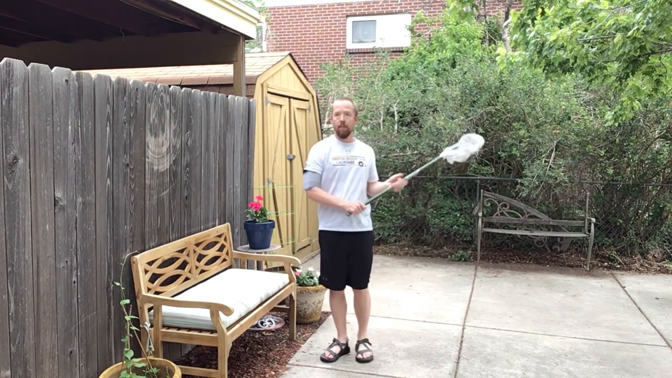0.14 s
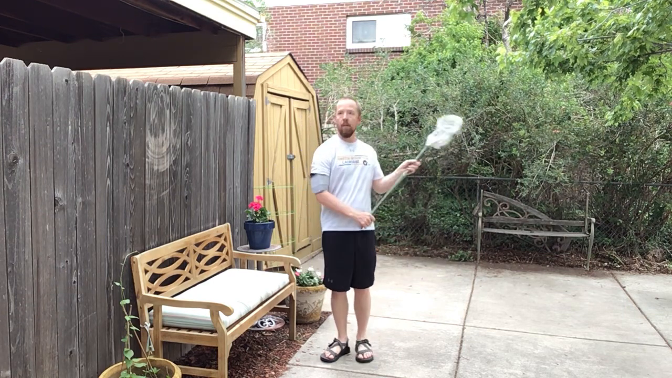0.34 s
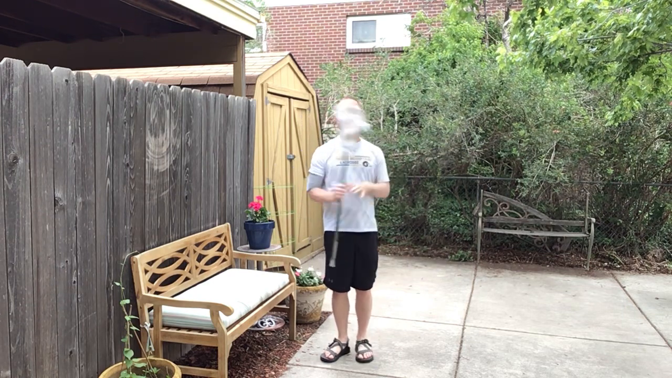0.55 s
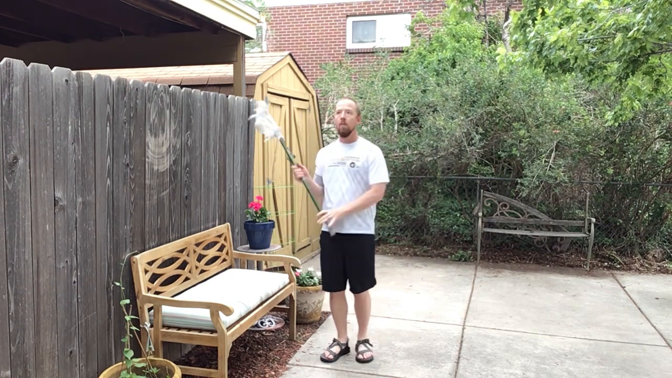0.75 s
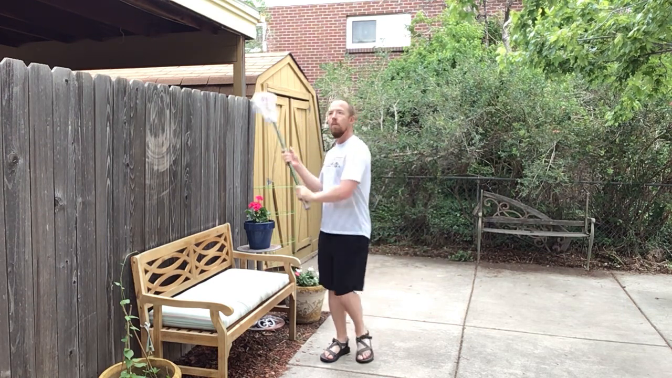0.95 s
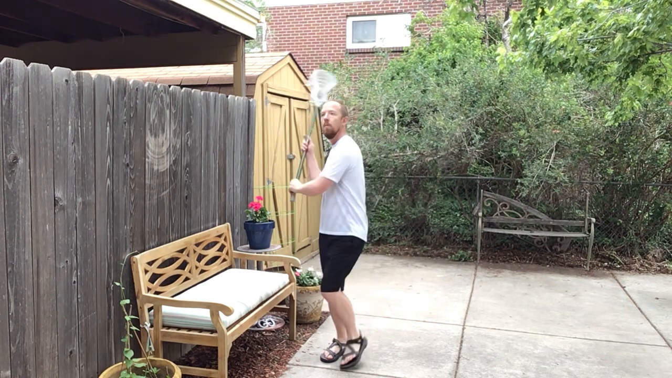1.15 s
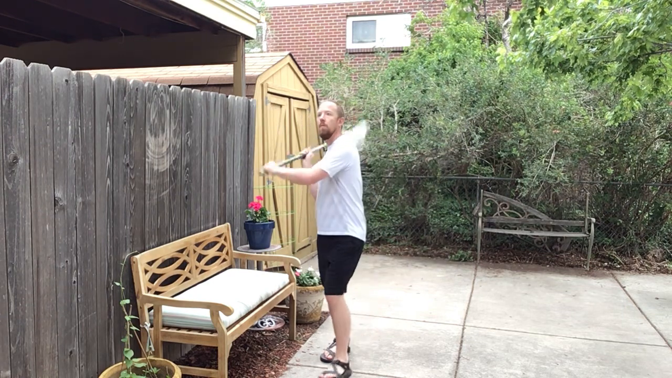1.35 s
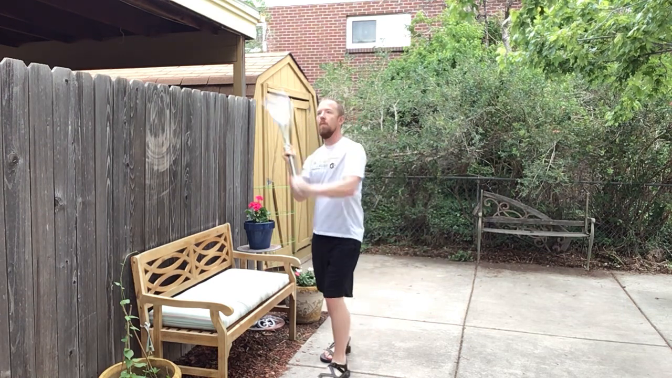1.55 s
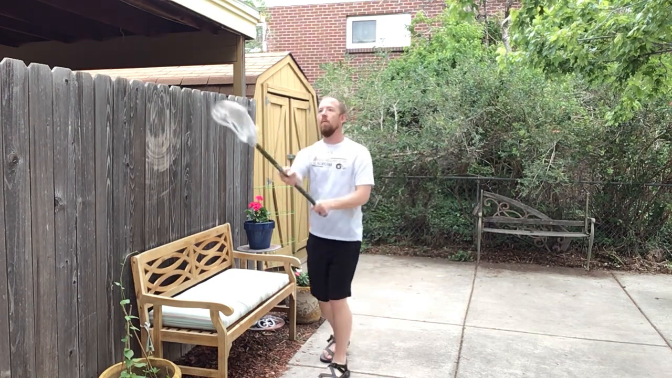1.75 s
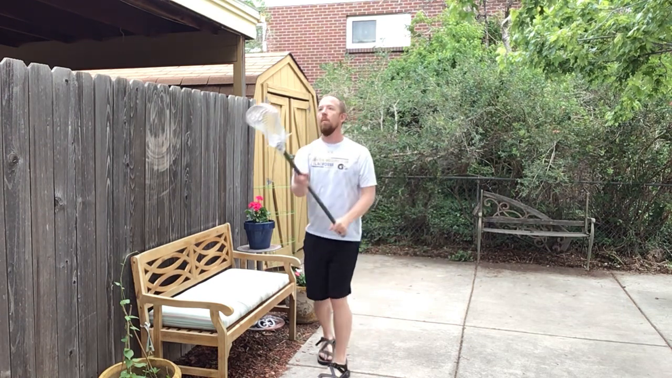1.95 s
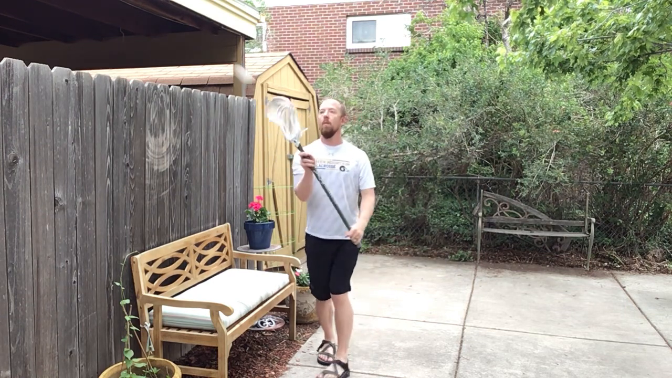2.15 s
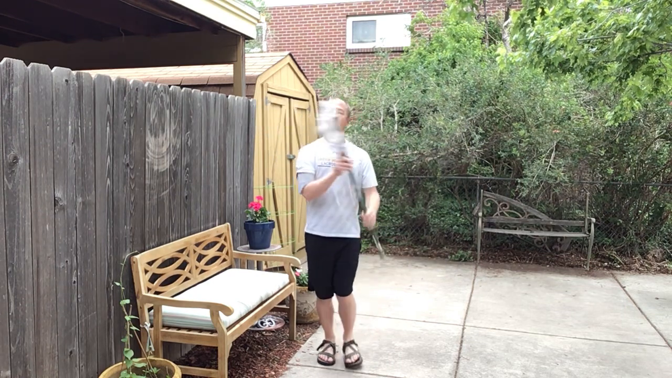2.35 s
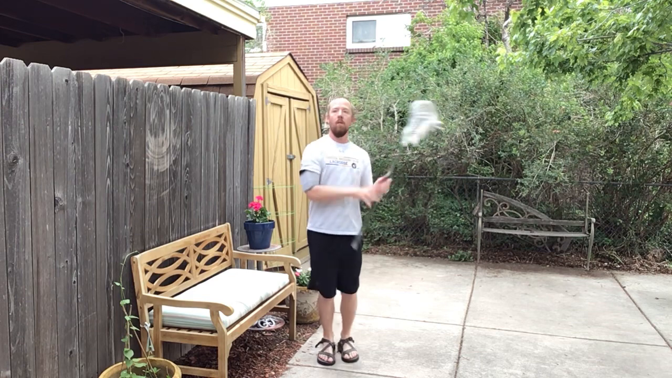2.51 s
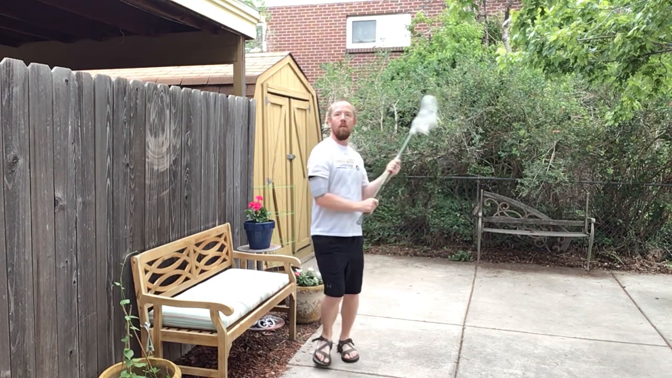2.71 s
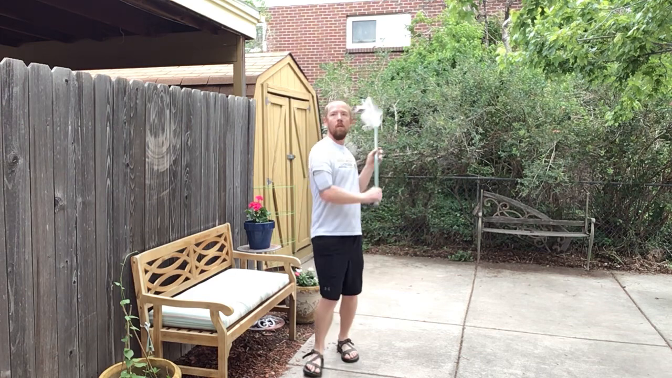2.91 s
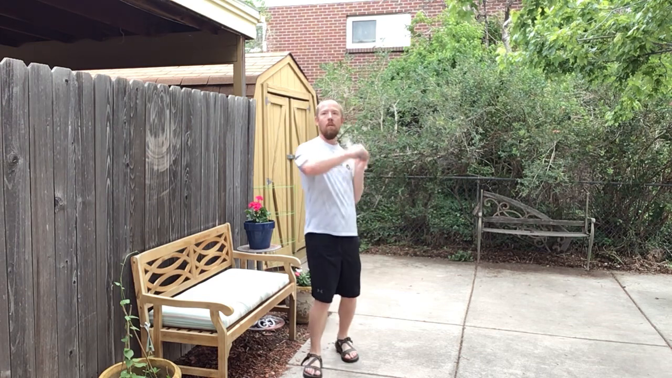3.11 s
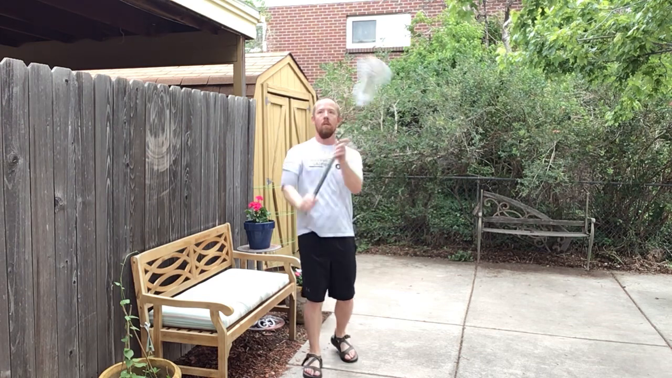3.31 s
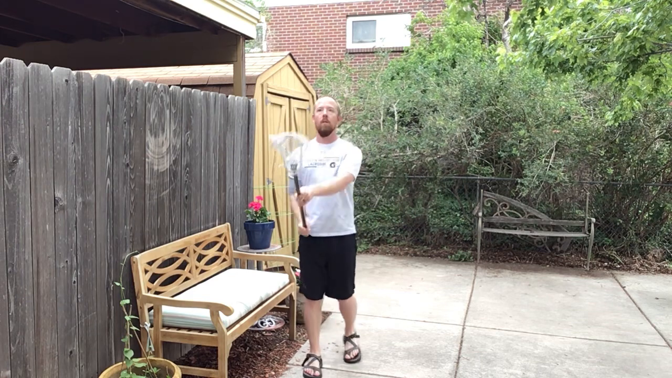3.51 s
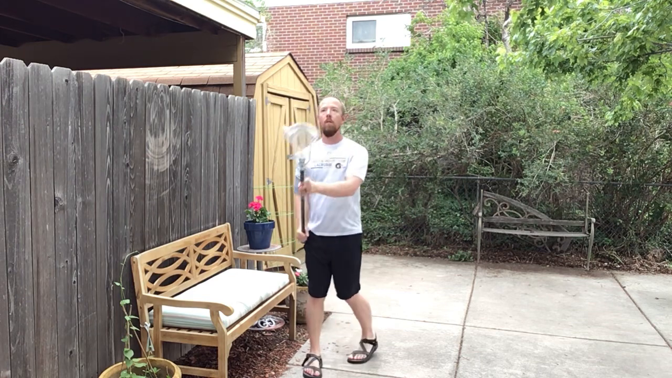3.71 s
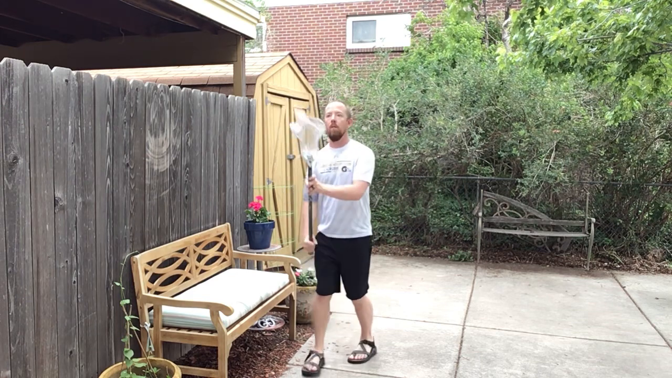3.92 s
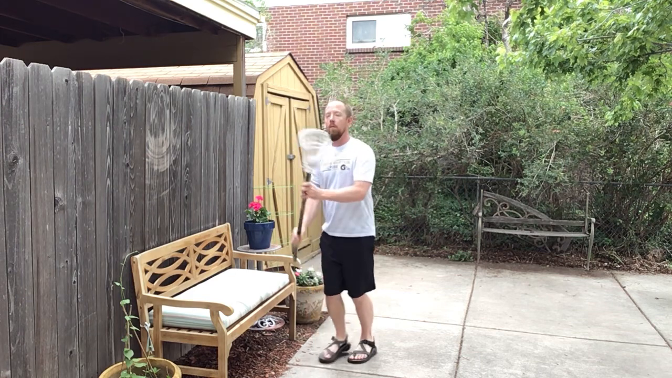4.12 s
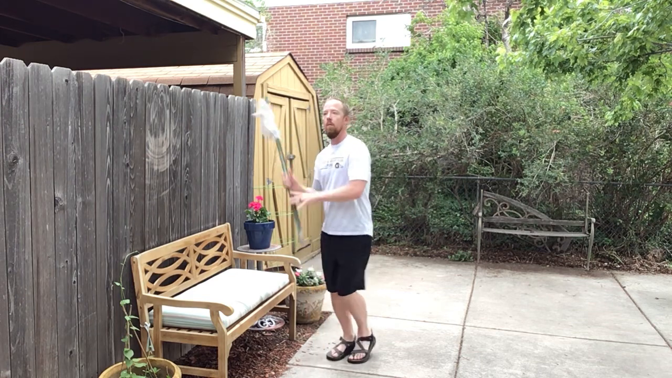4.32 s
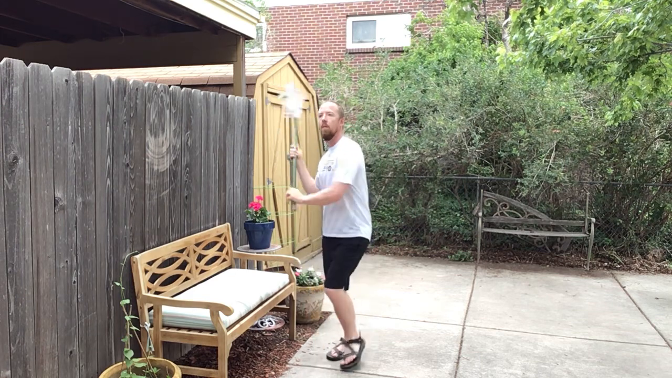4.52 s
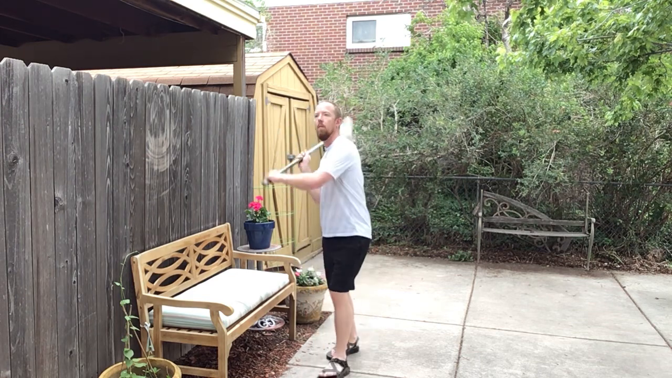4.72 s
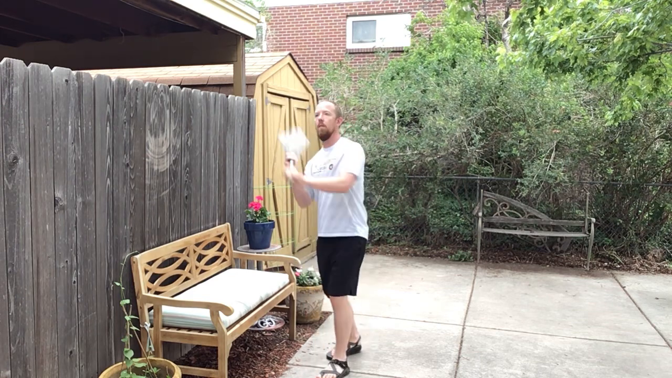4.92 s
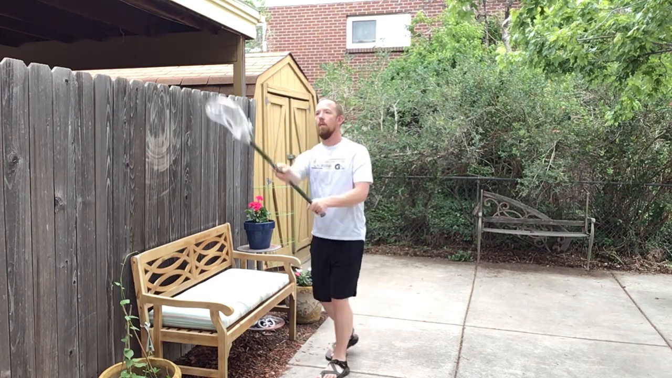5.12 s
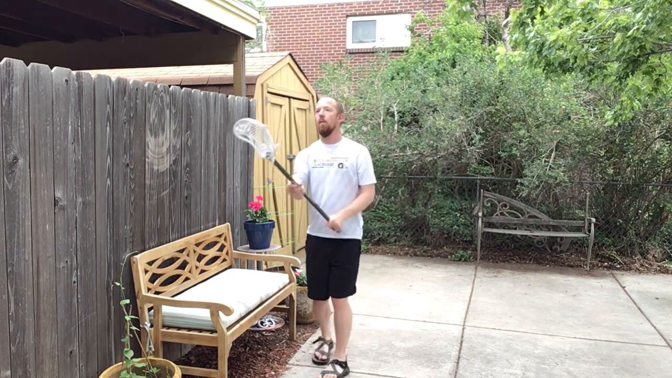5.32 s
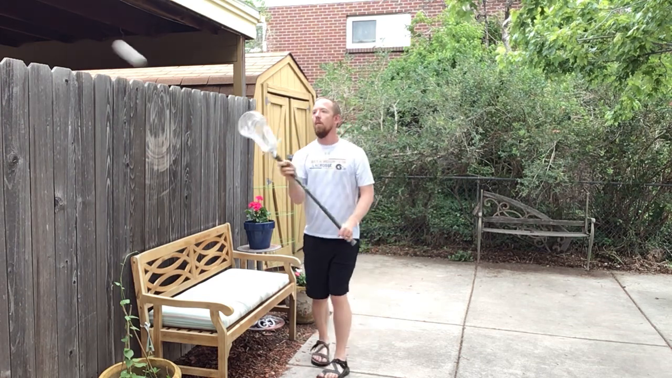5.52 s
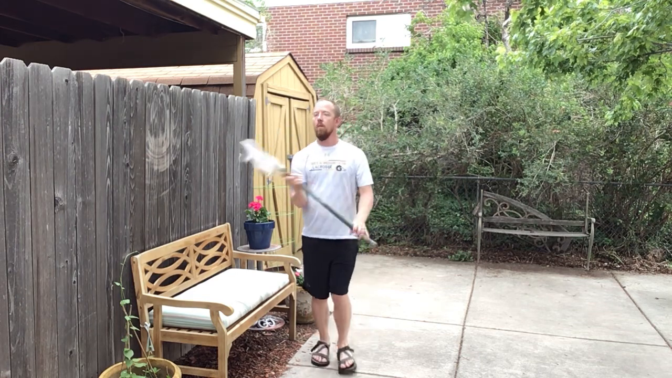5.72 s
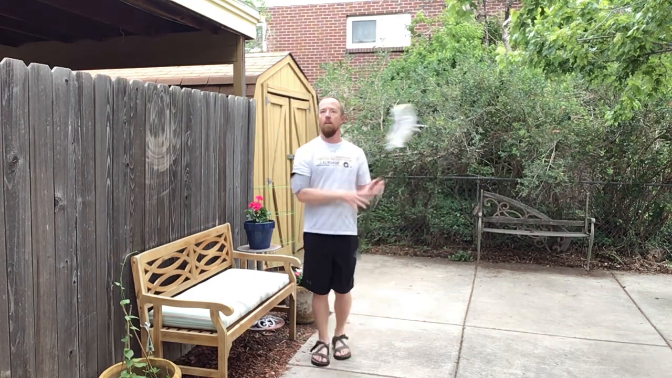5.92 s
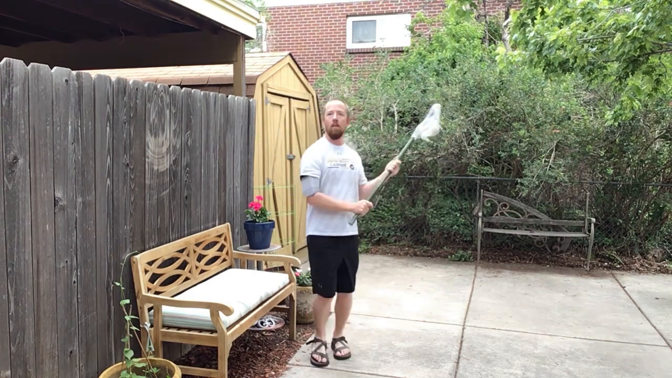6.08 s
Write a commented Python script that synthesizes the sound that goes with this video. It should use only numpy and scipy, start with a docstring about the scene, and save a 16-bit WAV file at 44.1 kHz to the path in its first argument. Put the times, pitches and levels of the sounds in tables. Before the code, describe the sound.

A faint, steady rumble of a distant town lies under a paved back yard. In the first second and a half, a few thin bird notes sound, with tiny ticks and rustles from a lacrosse stick being cradled. At about 1.9 seconds a rubber ball thuds against a wooden wall: a low, hollow boom with a slap and short clatter of boards and a tight echo. The hit repeats at 3.6 seconds, with a sharper crack, and at 5.3 seconds. These three thuds are by far the loudest sounds. About a third of a second after each, near 2.2, 4.0 and 5.7 seconds, the ball smacks softly into the mesh pocket and knocks the plastic head, then settles with a tick. The first catch is the quietest; the second adds a snap of strings. A bird chips at 2.4 seconds, and soft movement bumps come near 4.3 and 5.5 seconds.

```python
"""A paved back yard, lacrosse wall-ball: three throws thud against a wooden wall, whose boards
slap, boom, ring and clatter, with echoes off the paving, house and shed. A third of a second
after each thud the rubber ball smacks into the stick's mesh pocket and rings its plastic head.
The stick rattles and rustles as it is cradled; faint birds and a far town rumble lie behind."""
import sys
import numpy as np
from scipy import signal
from scipy.fft import rfft, irfft
from scipy.io import wavfile
from scipy.ndimage import uniform_filter1d

SR = 44100
rng = np.random.default_rng(int(sys.argv[2]) if len(sys.argv) > 2 else 0)


def put_to_file(sound):
    """Save the sound as 16-bit audio at rate SR, in the file named by the first command-line argument."""
    columns = np.atleast_2d(sound).T  # one column per channel
    safe = np.clip(columns, -1, 1)
    whole_steps = np.round(safe * 32767)
    wavfile.write(sys.argv[1], SR, whole_steps.astype(np.int16))


N = 271215
TIME = np.arange(N) / SR

# The ball hits the wall. Each row: crack start in seconds, crack level in dB, loss per slap in dB,
# clatter level in dB, thud start in seconds, thump level in dB, thump pitch in Hz, boom level in dB,
# boom rise in seconds, ring loss an octave off its centre in dB.
WALL_HITS = [(1.8860, -39, 3.5, -41, 1.888, -17.5, 251, -17, 0.0088, 4),
             (3.6242, -28, 7.5, -40.5, 3.6309, -23.5, 303, -19, 0.017, -0.5),
             (5.3023, -37, 1.5, -43, 5.2996, -18, 242, -16.5, 0.0087, 0.7)]
# The wall's ring. Each row: pitch in Hz, level in dB, time to fall 60 dB in seconds.
WALL_MODES = [(78.9, -12.5, 0.76), (101.3, 3, 0.48), (129.7, -4.5, 0.49), (168.4, 15, 0.13),
              (183.4, -1, 0.35), (217, -9, 0.63), (238.5, 6, 0.2), (253.6, -14, 0.3), (272.7, -4, 0.37),
              (339.8, -5.5, 0.273), (361.4, -17.5, 0.22), (404, -12, 0.29), (496, -22.5, 0.21),
              (516.7, -19.5, 0.26), (598, -23, 0.28)]
# Slapback from paving, house and shed. Each row: delay in seconds, level in dB.
YARD_ECHOES = [(.0062, -14), (0.0339, -8.5), (0.0858, -19)]
# The ball lands in the pocket. Each row: start in seconds, mesh level in dB, mesh centre in Hz,
# mesh width in octaves, knock level in dB, knock centre in Hz, tug level in dB, tug pitch in Hz,
# settling time in seconds, settling level in dB.
POCKET_CATCHES = [(2.222, -57.5, 4200, 0.89, -54, 1700, -54, 222, 2.4275, -60.5),
                  (3.9679, -50, 2000, 0.85, -45.5, 950, -43.5, 543, 4.169, -62),
                  (5.666, -50, 3830, 0.2, -46, 2200, -45.5, 290, 5.891, -62.5)]
# The plastic head's resonances. Each row: centre in Hz, width in Hz, boost in dB.
HEAD_RESONANCES = [(1025, 140, 8.5), (1480, 140, 5.5), (2570, 210, 5.5), (3040, 200, 3.5), (3990, 100, 6),
                   (4500, 120, -4)]
# Strings snap taut. Each row: start in seconds, level in dB.
STRING_SNAPS = [(3.9947, -43.5), (4.015, -46), (4.2945, -53.5)]
# The ball ticks on the head. Each row: start in seconds, level in dB, centre in Hz.
HEAD_TICKS = [(.063, -60, 1990), (1.125, -65, 3900), (1.624, -63, 3500), (4.871, -63, 2800),
              (4.8936, -61, 3500), (5.005, -61, 5470)]
# Soft bumps as the player moves. Each row: start in seconds, level in dB, seconds to fall 60 dB.
PLAYER_BUMPS = [(4.293, -51, 0.24), (5.545, -47, 0.22), (5.68, -47, 0.089)]
# Mesh and hands slide. Each row: peak time in seconds, level in dB, half length in seconds, centre in Hz.
GRIP_RUSTLES = [(1.016, -71, 0.012, 5000), (1.292, -72, 0.038, 4500), (5.569, -65.5, 0.016, 2300)]
# Hiss swells twice per cradle. Each row: first peak in seconds, first level in dB, second level in dB.
CRADLE_SWELLS = [(.27, -78, -72.5), (2.37, -73, -76.5), (4.15, -71, -76), (5.82, -74, -77)]
# Bird notes. Each row: start in seconds, length in seconds, opening pitch in Hz, closing pitch in Hz,
# level in dB, waver depth in Hz.
BIRD_NOTES = [(.308, .014, 4590, 3800, -62.5, 500), (0.36, 0.15, 3690, 3620, -74, 60),
              (0.661, 0.15, 3500, 3590, -73.5, 60), (.68, 0.14, 6850, 6880, -75.5, 60),
              (2.368, 0.0093, 3900, 4900, -55, 120)]
# EQ curves for the noise layers. Each row: frequency in Hz, level in dB.
CRACK_EQ = [(300, -4), (1000, -5), (2500, 7), (4000, 2), (6500, -1), (9000, -0.5), (12000, 0),
            (16000, -8.5)]
CLATTER_EQ = [(50, -2), (90, -3.5), (300, 8), (500, 5), (750, -2), (1050, -8.5), (1800, -16), (4000, -24),
              (12000, -29.5)]
YARD_EQ = [(200, 5), (1500, -4.5), (4000, -1.5), (9000, 3), (16000, -6)]
HISS_EQ = [(3000, -1.5), (6000, -4.5), (10000, -2.5), (13500, 1), (16000, -10)]
TOWN_EQ = [(25, -41), (50, -2), (115, -0.5), (190, -4), (280, -7), (400, -13.5), (740, -19.5),
           (1500, -26.5), (3500, -31.5), (6700, -36.5), (10000, -39), (14500, -46.5), (16000, -55)]

TICK_OCTAVES, TICK_DECAY_S, KNOCK_DECAY_S = 0.86, 0.0062, 0.0055


def wall_thuds(boom_hz=167, ring_db=-10.5):
    """Each hit drives a quick thump, a lower boom and a ring from the wall; all three echo back."""
    out = np.zeros(N)
    for *_, start, thump_db, thump_hz, boom_db, boom_rise_s, loss_db in WALL_HITS:
        add(out, start, from_db(thump_db) * board_swing(thump_hz, rise_s=0.0088))
        add(out, start, from_db(boom_db) * board_swing(boom_hz, boom_rise_s))
        add(out, start, from_db(boom_db + ring_db) * wall_ring(loss_db))
    echoes = sum(from_db(db) * np.interp(TIME - delay, TIME, out, left=0) for delay, db in YARD_ECHOES)
    return out + echoes


def board_swing(hz, rise_s):
    """A board swings up, then hands its motion on to the rest of the wall."""
    t = TIME[:SR // 2]
    envelope = (t / rise_s * np.exp(1 - t / rise_s)) ** 2
    return -np.sin(2 * np.pi * hz * t) * envelope


def wall_ring(loss_db, centre_hz=234, spread_s=0.0079):
    """The ring blooms as the blow spreads; the spot struck drives some modes harder than others."""
    ring = np.zeros(SR // 2)
    for k, (hz, db, t60) in enumerate(WALL_MODES):
        polarity = -(-1) ** (k // 2)  # pairs of modes move in opposite directions
        drive = from_db(db - loss_db * np.log2(hz / centre_hz) ** 2)
        ring += polarity * drive * mode(hz, t60)
    return ring * (1 - np.exp(-TIME[:len(ring)] / spread_s))


def board_cracks(gap_s=0.0019, decay_s=0.00076, dulling_db=2.5):
    """The bright edge of each thud: boards slap together three times, each softer and duller."""
    out = np.zeros(N)
    envelope = np.exp(-TIME[:SR // 20] / decay_s)
    for start, db, loss_db, *_ in WALL_HITS:
        for k in range(3):
            slap = burst(envelope, CRACK_EQ, tilt_db=3.5 - k * dulling_db, smooth_hz=1200)
            add(out, start + k * gap_s, from_db(db - k * loss_db) * slap)
    return out


def board_clatter(knock_db=0.5, knock_s=0.0042, wash_s=0.043, delay_s=0.00101):
    """The many small resonances of loose boards knock once and blur into a short wooden wash."""
    out, t = np.zeros(N), TIME[:SR // 2]
    envelope = np.exp(-t / wash_s) + from_db(knock_db) * np.exp(-t / knock_s)
    for start, _, _, db, *_ in WALL_HITS:
        add(out, start + delay_s, from_db(db) * burst(envelope, CLATTER_EQ, smooth_hz=151))
    return out


def catches(knock_delay_s=0.0048, tug_delay_s=0.0059, tug_cycles=10):
    """The ball brushes the mesh, bottoms out in the pocket and tugs it down with its weight."""
    out = np.zeros(N)
    for (start, mesh_db, mesh_hz, mesh_octaves, knock_db, knock_hz,
         tug_db, tug_hz, settle_s, settle_db) in POCKET_CATCHES:
        add(out, start, contact(mesh_db, mesh_hz, mesh_octaves, decay_s=0.0075))
        add(out, start + knock_delay_s, contact(knock_db, knock_hz, octaves=1.9, decay_s=KNOCK_DECAY_S))
        add(out, start + tug_delay_s, from_db(tug_db) * mode(tug_hz, t60=tug_cycles / tug_hz))
        # it settles against the head: a bright tick over a soft knock
        add(out, settle_s, contact(settle_db + 2.5, hz=3500, octaves=TICK_OCTAVES, decay_s=TICK_DECAY_S))
        add(out, settle_s, contact(settle_db + 3, hz=620, octaves=TICK_OCTAVES, decay_s=KNOCK_DECAY_S))
    return out


def stick_rattle(string_hz=6900, slip_delay_s=0.0033, bump_hz=113):
    """Strings snap taut and slip, the ball ticks in the head, and the player's moves bump softly."""
    out = np.zeros(N)
    for start, db in STRING_SNAPS:
        add(out, start, contact(db, string_hz, octaves=1, decay_s=0.0017))
        add(out, start + slip_delay_s, contact(db - 1, string_hz, octaves=1, decay_s=0.0067))
    for start, db, hz in HEAD_TICKS:
        add(out, start, contact(db, hz, TICK_OCTAVES, TICK_DECAY_S))
    for start, db, t60 in PLAYER_BUMPS:
        add(out, start, from_db(db) * mode(bump_hz, t60))
    return out


def mesh_rustle(swish_lead_s=0.52, swish_db=-75.5, swish_half_s=0.05, swish_hz=2500,
                roll_delay_s=0.018, roll_half_s=0.011, roll_hz=3330):
    """The mesh rubs as the stick swishes forward, as the settling ball rolls and as the grip shifts."""
    out, t = np.zeros(N), TIME[:SR // 5]
    middle_s = t.mean()
    swishes = [(hit_s - swish_lead_s, swish_db, swish_half_s, swish_hz) for hit_s, *_ in WALL_HITS]
    rolls = [(settle_s + roll_delay_s, db, roll_half_s, roll_hz) for *_, settle_s, db in POCKET_CATCHES]
    for peak_s, db, half_s, hz in [*swishes, *rolls, *GRIP_RUSTLES]:
        rub = grains(hz, octaves=0.75, size=len(t))
        add(out, peak_s - middle_s, from_db(db) * rub * swell(t, middle_s, half_s))
    return out


def plastic_head(x, trim_db=-1.0):
    """The plastic head rings briefly with whatever happens in its strings."""
    rings = np.zeros(N)
    for hz, width_hz, boost_db in HEAD_RESONANCES:
        band = signal.lfilter(*signal.iirpeak(hz, hz / width_hz, fs=SR), x)
        rings += (from_db(boost_db) - 1) * band
    return from_db(trim_db) * (x + rings)


def birds():
    """Birds give short chips and thin, unsteady whistles."""
    out, t = np.zeros(N), TIME[:SR // 4]
    for start, length_s, from_hz, to_hz, db, waver_hz in BIRD_NOTES:
        waver = rms_one(uniform_filter1d(rng.standard_normal(len(t)), size=60))
        progress = np.minimum(t / length_s, 1)
        hz = from_hz + (to_hz - from_hz) * progress + waver_hz * waver
        whistle = np.sin(2 * np.pi * np.cumsum(hz) / SR)
        add(out, start, from_db(db) * np.sin(np.pi * progress) * whistle)
    return out


def yard_reverb(x, wet_db, build_s, t60=0.15):
    """Fence, bench and bushes scatter a short tail behind the dry sound."""
    t = TIME[:SR // 2]
    build_up = 1 - np.exp(-(t / build_s) ** 2)
    tail = burst(build_up * from_db(-60 * t / t60), YARD_EQ)
    wet = signal.fftconvolve(x, tail / np.linalg.norm(tail))[:N]
    return x + from_db(wet_db) * wet


def hiss(rebound_delay_s=0.18, rebound_db=-79.5, gap_s=0.23):
    """A faint high hiss swells once as the ball flies back and twice as the stick is cradled."""
    swells = [(hit_s + rebound_delay_s, rebound_db) for hit_s, *_ in WALL_HITS]
    for peak_s, first_db, second_db in CRADLE_SWELLS:
        swells += [(peak_s, first_db), (peak_s + gap_s, second_db)]
    envelope = sum(from_db(db) * swell(TIME, peak_s, half_s=0.057) for peak_s, db in swells)
    return envelope * noise(HISS_EQ)


def town_rumble(level_db=-57.5):
    """The far town lays a steady low bed under the yard."""
    return from_db(level_db) * noise(TOWN_EQ)


def contact(db, hz, octaves, decay_s, attack_s=0.00036):
    """A hit in the stick's head: grains with a snap attack and a quick decay."""
    t = TIME[:SR // 5]
    envelope = (1 - np.exp(-t / attack_s)) * np.exp(-t / decay_s)
    return from_db(db) * grains(hz, octaves, len(t)) * envelope


def grains(hz, octaves, size, uneven_db=3.5):
    """Friction texture: dense tiny slips of uneven strength in a broad resonance; rms one."""
    grit = np.repeat(rng.standard_normal(size // 32 + 1), 32)[:size]
    slips = rng.standard_normal(size) * from_db(uneven_db * grit)
    off_centre = np.log2((np.fft.rfftfreq(size, 1 / SR) + 1) / hz) / octaves
    return rms_one(irfft(rfft(slips) / np.sqrt(1 + off_centre ** 4), size))


def burst(envelope, eq, tilt_db=0, smooth_hz=400):
    """A noise hit, flattened along frequency and then equalised; keeps the envelope's energy."""
    size = len(envelope)
    spectrum = rfft(rng.standard_normal(size) * envelope, 2 * size)
    local_power = uniform_filter1d(np.abs(spectrum) ** 2, size=int(2 * size * smooth_hz / SR) + 1)
    flat = spectrum / np.sqrt(local_power + 1e-12)
    shaped = irfft(flat * eq_gain(eq, 2 * size, tilt_db))[:size]
    return shaped * np.linalg.norm(envelope) / np.linalg.norm(shaped)


def noise(eq):
    """A steady bed of equalised noise; rms one."""
    return rms_one(irfft(rfft(rng.standard_normal(N)) * eq_gain(eq, N), N))


def eq_gain(eq, size, tilt_db=0):
    """An EQ curve as a gain for each frequency bin, tilted in dB per octave."""
    octave = np.log2(np.fft.rfftfreq(size, 1 / SR) + 1)
    hz, db = np.transpose(eq)
    return from_db(np.interp(octave, np.log2(hz), db) + tilt_db * octave)


def mode(hz, t60):
    """Half a second of a decaying sine."""
    t = TIME[:SR // 2]
    return np.sin(2 * np.pi * hz * t) * from_db(-60 * t / t60)


def swell(t, peak_s, half_s):
    """A bell-shaped fade in and out; peak one."""
    return np.exp(-((t - peak_s) / half_s) ** 2 / 2)


def from_db(db):
    """Decibels to gain."""
    return 10 ** (np.asarray(db) / 20)


def rms_one(x):
    """Scale to an rms of one."""
    return x / np.sqrt(np.mean(x ** 2) + 1e-20)


def add(out, start_s, sound):
    """Mix a sound in on its cue."""
    start = max(0, round(start_s * SR))
    out[start:start + len(sound)] += sound[:N - start]


def scene():
    """The mono mix: the wall, the player's stick and the surroundings."""
    cracks = yard_reverb(board_cracks(), wet_db=-7.0, build_s=0.0022)
    stick = plastic_head(catches() + stick_rattle() + mesh_rustle())
    stick_and_birds = yard_reverb(stick + birds(), wet_db=-9.0, build_s=0.0095)
    wall = wall_thuds() + board_clatter() + cracks
    return (wall + stick_and_birds + town_rumble() + hiss())[None]


def record(dry):
    """The microphone drops the deepest bass; a steep high cut takes off the very top."""
    low_cut = signal.butter(10, 47, "high", fs=SR, output="sos")
    high_cut = signal.ellip(10, .1, 70, 16400, fs=SR, output="sos")
    return signal.sosfilt(high_cut, signal.sosfilt(low_cut, dry))


dry = scene()
out = record(dry)
put_to_file(out)
```